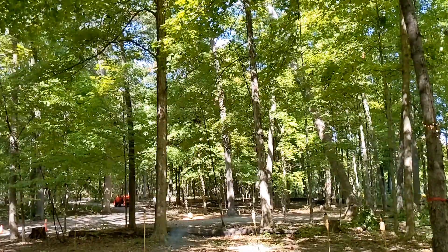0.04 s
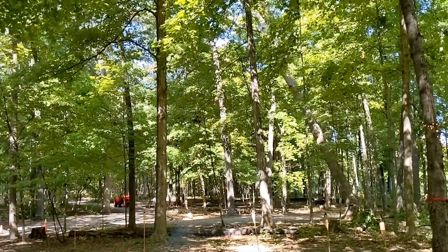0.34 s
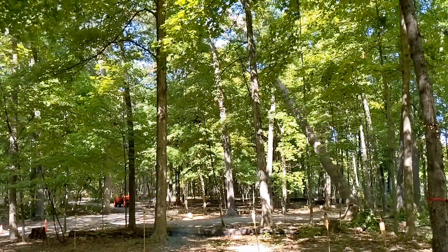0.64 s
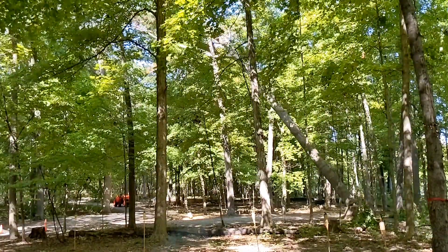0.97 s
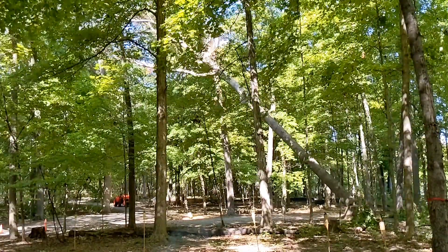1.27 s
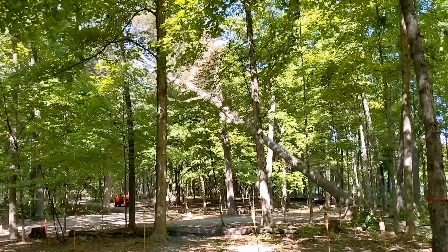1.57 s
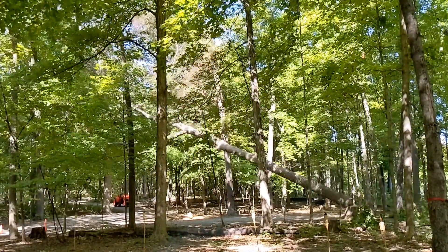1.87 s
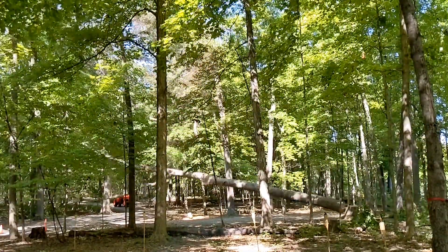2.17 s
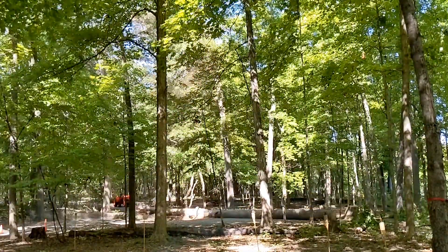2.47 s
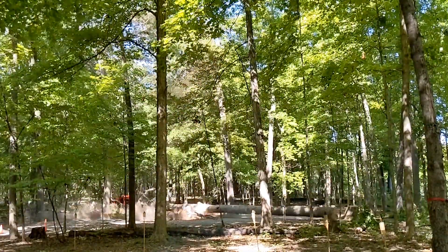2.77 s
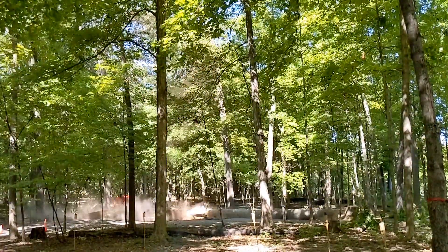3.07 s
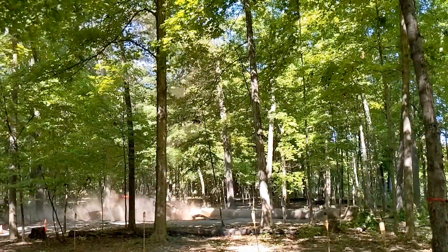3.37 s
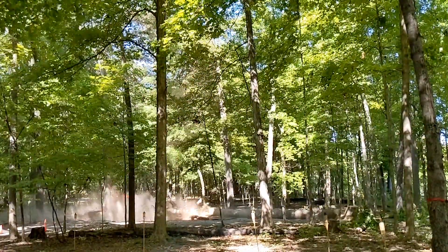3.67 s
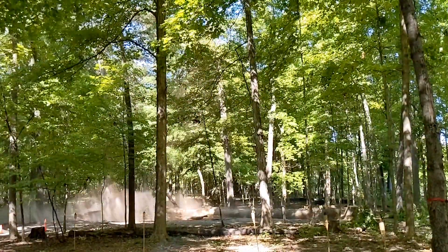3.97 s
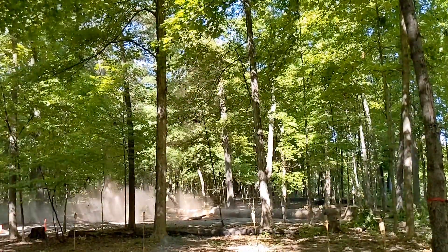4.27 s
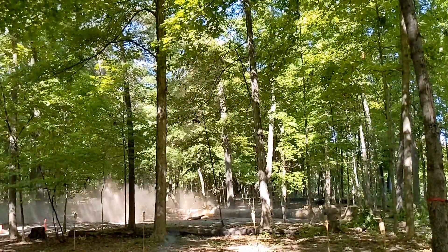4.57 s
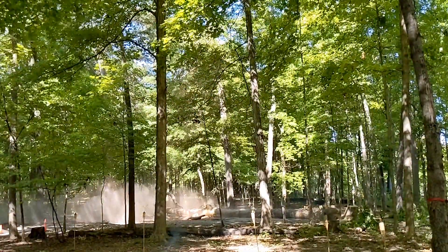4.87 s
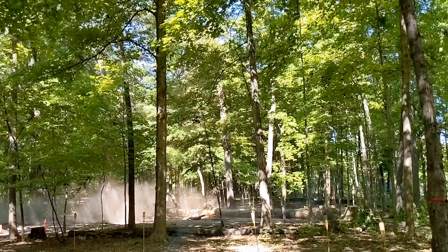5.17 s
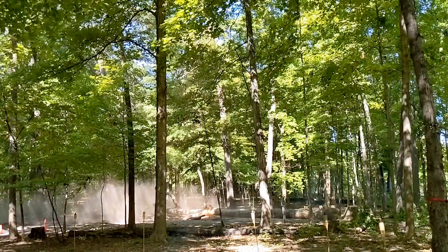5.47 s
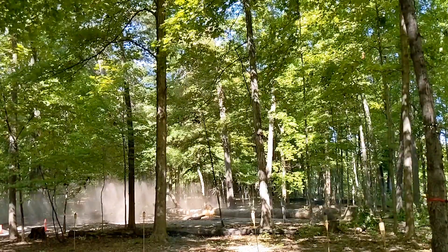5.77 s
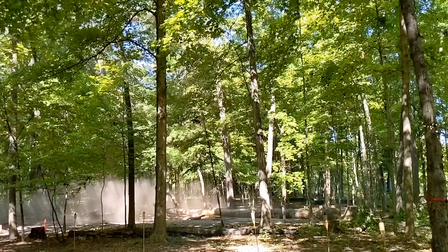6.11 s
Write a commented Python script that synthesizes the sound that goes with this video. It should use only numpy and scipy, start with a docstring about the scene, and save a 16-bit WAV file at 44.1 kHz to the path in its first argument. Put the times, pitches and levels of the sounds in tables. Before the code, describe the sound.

A sharp crack of wood opens the sound as a tall tree starts to fall in a forest. More splintering cracks and dull knocks follow through the first second. From about 1.1 to 1.6 seconds a loud volley of breaking limbs comes with a swelling rustle and crackle as the crown tears through neighbouring trees. This eases slightly, then surges at 2.4 seconds, and the trunk hits the ground at about 2.6 with a heavy, low boom. Branches keep breaking and leaves thrash until around 3.3 seconds. Another limb lands with a thud and sharp snaps near 3.8 seconds. After that the rustle fades, with a few small twig snaps and soft knocks until the end at about 6 seconds. The cracks and thuds echo briefly among the trees, and a very faint machine hums far away throughout.

```python
"""A leafy wood, where a tall tree goes over from right to left. Its hinge and limbs crack in volleys of
parting fibres, the crown tears through its neighbours in a wash of crackle and rustle, and the trunk
slams into the ground with a low boom. Limbs drop after it, twigs snap and leaves settle. Cracks, thuds
and snaps scatter off the standing trunks, and a machine hums far away."""
import sys
import numpy as np
from scipy import signal
from scipy.fft import rfft, irfft, next_fast_len
from scipy.io import wavfile

SR = 44100
rng = np.random.default_rng(int(sys.argv[2]) if len(sys.argv) > 2 else 0)


def generate_wav(sig):
    """Save sig (samples, or channels by samples) to the path in sys.argv[1] as 16-bit PCM at SR."""
    pcm = np.round(np.clip(np.atleast_2d(sig).T, -1, 1) * 32767).astype(np.int16)
    wavfile.write(sys.argv[1], SR, pcm)


N = 270774
TIME = np.arange(N) / SR
TRUNK_REACH = .5   # the trunk lies half as far off centre as the crown

# The far machine's drone. Each row: pitch in Hz, level in dB.
MACHINE_TONES = [(83, -81.5), (119, -62), (168, -65.5), (251, -73), (296, -59.5)]
# The crown's direction. Each row: time in seconds, lead of the left microphone in samples.
CROWN_BEARING = [(0, 2), (1.2, 4), (1.7, 6), (2.25, 9), (2.7, 7), (3.3, 7), (3.7, 5), (6.1, 5)]
# Pan of the breaking wood and foliage. Each row: time in seconds, left minus right in dB.
CROWN_PAN = [(0, 1), (1.0, 0.2), (1.3, -2.2), (1.8, 0), (2.3, -0.2), (2.6, -3.5), (3.2, -1.8), (3.6, 0.6),
             (6.1, 0)]
# Tone of each texture. Each row: frequency in Hz, gain in dB.
BRANCH_EQ = [(150, -15.5), (220, -7), (400, -3.5), (700, 1), (1100, -0.5), (1600, -0.5), (2300, -1.5),
             (3500, -9.5), (7000, -24.5)]
LEAF_EQ = [(700, -46), (1300, 0.5), (2400, 4), (4000, 0), (6000, -2), (8500, -9), (10500, -12),
           (12500, -9.5), (15000, -17.5)]
TWIG_EQ = [(1200, 24), (2400, -2), (4000, -6), (8000, -12), (13000, -38)]
RUMBLE_EQ = [(25, -2), (48, -10.5), (72, 5), (130, 1.5), (200, 1.5), (300, -6.5), (500, -2.5), (1000, -34)]
SPLINTER_EQ = [(60, -29), (200, 1), (600, 2.5), (2200, 2.5), (3300, -7.5), (5000, -7.5), (9000, -25),
               (15000, -78)]
# Fader rides for stirred leaves and for small branches breaking. Each row: time in seconds, level in dB.
LEAF_RIDE = [(0, -40), (.38, -35.5), (.58, -34), (1.05, -29), (1.2, -25), (1.6, -25.5), (2.0, -27),
             (2.4, -25), (3.25, -27), (3.55, -34), (3.85, -31), (4.5, -40), (5.1, -48), (5.8, -51.5)]
BRANCH_RIDE = [(.04, -22), (.28, -31.5), (.6, -25.5), (1.05, -27), (1.3, -18), (1.7, -25.5), (2.05, -28.5),
               (2.42, -21.5), (2.62, -16.5), (3.1, -19), (3.55, -31), (4.3, -43.5), (4.8, -41.5),
               (5.5, -52.5), (6.14, -54)]
# Wood breaking. Each row: start and length in seconds, level in dB, pitch in Hz,
# splinters against the body in dB.
WOOD_CRACKS = [(.011, 0.0039, -11.5, 1730, -12), (0.099, 0.017, -19.5, 920, -7),
               (.176, 0.02, -22, 905, -7.5), (0.397, 0.029, -15.5, 770, -25), (.431, 0.025, -17, 540, -0.5),
               (0.532, .0085, -10.5, 850, -15), (0.64, 0.012, -21, 1240, 3), (0.699, .0093, -23.5, 806, -2),
               (0.718, 0.026, -22, 800, 3), (0.949, 0.014, -26, 1220, 3), (1.049, 0.013, -22, 600, -15),
               (1.088, 0.021, -16, 1170, -4), (1.128, 0.0074, -20, 1010, -1), (1.17, 0.023, -17, 490, -2.5),
               (1.253, 0.024, -10, 423, -10), (1.28, 0.027, -19.5, 636, 6), (1.36, 0.014, -11, 890, -18),
               (1.505, 0.0066, -15.5, 357, -0.5), (1.521, 0.013, -12.5, 2100, -15),
               (1.534, 0.007, -14, 715, 0.5), (1.866, 0.01, -25, 1210, -10), (1.925, 0.012, -29, 814, 2.5),
               (2.121, 0.0067, -18, 1830, -19), (2.169, 0.016, -24.5, 1770, -3),
               (2.301, 0.01, -25, 990, 9.5), (2.384, 0.029, -20, 1110, -10),
               (2.476, 0.026, -13.5, 650, -24), (2.5, 0.046, -17.5, 865, -19),
               (2.536, 0.089, -26.5, 493, 5), (2.82, 0.041, -24, 1050, 2.5), (2.951, 0.033, -22, 943, -27),
               (2.982, 0.0068, -11.5, 920, -22), (3.061, 0.0045, -12.5, 2180, -9),
               (3.22, 0.071, -29.5, 1120, -2), (3.818, 0.0029, -10.5, 2510, -13),
               (4.531, 0.017, -40.5, 400, -10), (4.635, 0.0062, -43, 382, 13.5), (5.056, .007, -45, 387, 3),
               (6.068, 0.0033, -39, 2300, -9)]
# Heavy wood hitting trunks and ground; the first three rows, in the first second, are the hinge groaning low
# before the fall. Each row: start and length in seconds, level in dB, pitch in Hz.
LOG_THUDS = [(.02, 0.11, -34, 195), (0.441, 0.027, -30.5, 185), (0.654, 0.12, -33.5, 203),
             (1.171, 0.051, -25.5, 73), (1.18, 0.044, -23.5, 215), (1.5, 0.094, -37, 74.6),
             (1.252, 0.063, -21.5, 308), (2.505, 0.1, -20.5, 111), (2.586, 0.063, -19.5, 225),
             (2.626, 0.055, -15, 130), (2.641, 0.074, -12, 73), (3.176, 0.011, -16, 148),
             (3.742, 0.0052, -12, 261), (3.751, 0.011, -19.5, 232), (3.763, 0.022, -23.5, 85),
             (3.79, .17, -34.5, 123), (4.642, 0.0051, -30, 245), (4.78, 0.019, -42, 139),
             (5.055, 0.033, -40, 287)]
# Boughs whipping past or flopping down. Each row: start and length in seconds, leaves and branches in dB.
BOUGH_SWISHES = [(0.417, .03, -29.5, -28), (.642, .012, -34, -42), (1.1, 0.036, -30, -44),
                 (1.517, 0.1, -29.5, -38), (2.106, 0.017, -27.5, -48), (2.477, 0.042, -18.5, -42),
                 (2.69, 0.0096, -24.5, -36), (2.942, 0.014, -21.5, -41), (3.133, 0.11, -23, -27.5),
                 (3.798, 0.056, -31, -45), (4.096, 0.067, -30.5, -37), (4.637, 0.05, -34.5, -46),
                 (5.193, 0.036, -38.5, -56)]
# Dry twigs. Each row: start in seconds, peak of the ring in dB, pitch in Hz.
TWIG_SNAPS = [(2.83, -9, 2360), (3.127, -10.5, 9300), (3.7, -21, 5000), (3.743, -14.5, 3000),
              (3.807, -17, 3240), (3.841, -13, 6060), (4.118, -13, 4170), (4.583, -24.5, 6700),
              (4.638, -17.5, 2840), (5.058, -27.5, 2200), (5.195, -26, 8300), (5.522, -31.5, 2430)]
# Tone of the side signal and of each microphone. Each row: frequency in Hz, gain in dB.
SIDE_EQ = [(100, -6), (250, -0.5), (500, -3), (1000, -0.5), (2000, 1), (4000, 0)]
LEFT_EQ = [(900, 0.5), (1350, 3.5), (2400, 3), (4400, 0.5), (8100, 1.5), (10500, 3.5), (13800, 5.5),
           (15000, -6)]
RIGHT_EQ = [(1400, -1.5), (1700, -3.5), (3400, -1), (4700, -2.5), (6200, -6.5), (7000, -3.5), (9300, 4),
            (11500, 0), (13000, -4)]
# Peaks and dips of the left microphone's port. Each row: centre and width in Hz, gain in dB.
PORT_BANDS = [(1535, 330, -10), (2280, 67, 2.5), (2595, 270, -9.5), (3170, 240, 1), (3580, 380, -2),
              (4280, 180, 4), (5220, 180, 4), (6210, 130, 5), (7084, 306, 10.5), (8200, 450, 9.5),
              (9030, 210, 5), (11060, 420, -2)]


def from_db(db):
    """Decibels to gain."""
    return 10 ** (np.asarray(db) / 20)


def curve(rows, t=TIME):
    """Read an automation curve at times t."""
    return np.interp(t, *np.transpose(rows))


def drift(per_s):
    """Slow random wobble with a spread of about one."""
    knots = rng.standard_normal(4096)
    return np.interp(TIME * per_s, np.arange(len(knots)), knots)


def equalise(x, points):
    """Minimum-phase EQ through points of frequency and gain."""
    size = 2 * next_fast_len(x.shape[-1] // 2 + 2048)
    hz, db = np.transpose(points)
    grid = np.maximum(np.fft.rfftfreq(size, 1 / SR), 1)
    gain = from_db(np.interp(np.log(grid), np.log(hz), db))
    cepstrum = irfft(np.log(gain))
    cepstrum[1:size // 2] *= 2
    cepstrum[size // 2 + 1:] = 0
    return irfft(rfft(x, size) * np.exp(rfft(cepstrum)))[..., :x.shape[-1]]


def resonate(x, hz, width_hz):
    """One resonance with unity gain at its peak."""
    r = np.exp(-np.pi * width_hz / SR)
    feedback = [1, -2 * r * np.cos(2 * np.pi * hz / SR), r * r]
    return signal.lfilter(np.array([1, 0, -1]) * (1 - r * r) / 2, feedback, x + 1e-18)


def burst(t, length, rise, fall):
    """Envelope that swells, holds, then dies; all in seconds."""
    return (1 - np.exp(-t / rise)) * np.exp(-np.maximum(t - length, 0) / fall)


def levelled(x, length):
    """Give a burst the energy of `length` seconds at unit power."""
    return x / np.sqrt(np.sum(x ** 2) / (length * SR) + 1e-20)


def place(out, sound, start_s, reach=1):
    """Lay a hit into both channels, the right one later as the bearing says."""
    for channel, lag in enumerate((0, int(round(reach * curve(CROWN_BEARING, start_s))))):
        start = int(start_s * SR) + lag
        out[channel, start:start + len(sound)] += sound[:N - start]


def machine(waver_hz=2.78, flutter_db=4.0):
    """A distant engine's low tones waver on their way through the trees."""
    hum = 0
    for hz, db in MACHINE_TONES:
        level = from_db(db + flutter_db * drift(7.8))
        phase = 2 * np.pi * np.cumsum(hz + waver_hz * drift(20)) / SR
        hum += np.sqrt(2) * level * np.sin(phase)
    return hum


def grains(eq, per_s, size_db, clump_db, spread_samples, reach=1, bands=14):
    """Clumps of uneven clicks, each ringing briefly in one band from its own direction; unit power."""
    at = np.flatnonzero(rng.random(N) < per_s / SR)
    grain_db = size_db * np.minimum(rng.exponential(1, N), 4)[at] + clump_db * drift(60)[at]
    sizes = from_db(grain_db) * rng.choice([-1, 1], N)[at]
    scatter = spread_samples * rng.standard_normal(N)[at]
    lag = np.round(reach * curve(CROWN_BEARING, TIME[at]) + scatter).astype(int)
    band = rng.integers(0, bands, N)[at]
    pitches = np.geomspace(eq[0][0], eq[-1][0], bands)
    damping = np.log(pitches[1] / pitches[0])   # neighbouring rings just overlap
    rings = 0
    for k, hz in enumerate(pitches):
        clicks = [np.bincount(np.clip(at + side, 0, N - 1), sizes * (band == k), N) for side in (0, lag)]
        rings += resonate(np.array(clicks), hz, damping * hz)
    texture = equalise(rings, eq)
    return texture / np.sqrt(np.mean(texture ** 2) + 1e-20)


def crown(twig_db=-16):
    """Branches crackle, leaves rustle among ticking twigs, and heavy limbs shudder underneath."""
    branches = grains(BRANCH_EQ, per_s=7000, size_db=3.2, clump_db=1, spread_samples=6.25)
    leaves = grains(LEAF_EQ, per_s=26000, size_db=-1.5, clump_db=1, spread_samples=5)
    twigs = grains(TWIG_EQ, per_s=80, size_db=2.5, clump_db=-4.5, spread_samples=2.2, bands=7)
    rumble = grains(RUMBLE_EQ, per_s=2500, size_db=3.5, clump_db=.5, spread_samples=18, reach=TRUNK_REACH)
    leaf_swish, branch_swish = swish_gains()
    foliage = open_treble(leaves + from_db(twig_db) * twigs)
    rustle = foliage * np.hypot(from_db(curve(LEAF_RIDE)), leaf_swish)
    crackle = branches * np.hypot(from_db(curve(BRANCH_RIDE)), branch_swish)
    return crackle + rustle + rumble * rumble_gain()


def open_treble(rustle, shelf_hz=9500, flat_at_s=1.97, db_per_s=1.2):
    """The rustle's top end opens steadily as the crown comes down out of the foliage."""
    treble = signal.sosfiltfilt(signal.butter(3, shelf_hz, "high", fs=SR, output="sos"), rustle)
    return rustle + treble * (from_db(db_per_s * (TIME - flat_at_s)) - 1)


def rumble_gain(shudder_db=-23, floor_db=-50.5, shake_db=1, reference_hz=98, fall_db_per_s=23):
    """Rumble rides the breaking branches; each thud shakes limbs and earth, the deeper the more."""
    power = from_db(curve(BRANCH_RIDE) + shudder_db) ** 2 + from_db(floor_db) ** 2
    for start, length, db, hz in LOG_THUDS:
        fed_s = np.clip(TIME - start, 0, length)
        since_s = np.maximum(TIME - start - length, 0)
        power += fed_s * (from_db(db + shake_db - fall_db_per_s * since_s) * reference_hz / hz) ** 2
    return np.sqrt(power)


def cracks(slips_per_s=4500, size_db=1.5, damping=.68):
    """Fibres part in a swelling volley; the limb gives it a broad ring and splinters add an edge."""
    out, t = np.zeros((2, N)), TIME[:SR // 5]
    for start, length, db, hz, splinter_db in WOOD_CRACKS:
        slips = (rng.random(len(t)) < slips_per_s / SR) * rng.choice([-1, 1], len(t))
        slips = slips * from_db(size_db * np.minimum(rng.exponential(1, len(t)), 3))
        slips *= burst(t, length, rise=.061 * length, fall=.0042)
        ring = resonate(slips, hz, damping * hz)
        body = signal.sosfilt(signal.butter(2, 2 * hz, fs=SR, output="sos"), ring)
        edge = equalise(slips * rng.choice([-1, 1], len(t)), SPLINTER_EQ)
        crack = levelled(body, length) + from_db(splinter_db) * levelled(edge, length)
        place(out, from_db(db) * crack, start)
    return out


def thuds(first_blow=26, damping=.34):
    """A log strikes, then lands along its length: many soft contacts drive one low, damped boom."""
    out, t = np.zeros((2, N)), TIME[:SR // 2]
    for start, length, db, hz in LOG_THUDS:
        push = rng.standard_normal(len(t)) * burst(t, length, rise=.0052, fall=.002)
        push[0] = first_blow
        boom = resonate(resonate(push, hz, damping * hz), hz, 1.47 * hz)
        place(out, from_db(db) * levelled(boom, length), start, TRUNK_REACH)
    return out


def forest_echo(hits, count=2500, t60_s=.69, band_hz=(220, 4500), nearest_s=.012):
    """Trunks throw echoes from all sides; the bass passes them by and foliage dulls the top."""
    delay_s = nearest_s + rng.random(count) ** 1.5
    strength = rng.standard_normal(count) * from_db(-60 * delay_s / t60_s)
    lag = rng.integers(-18, 19, count)
    at = (delay_s * SR).astype(int)
    echoes = np.array([np.bincount(at + side, strength, 2 * SR) for side in (0, lag)])
    echoes /= np.linalg.norm(strength)
    tail = signal.sosfilt(signal.butter(1, band_hz, "band", fs=SR, output="sos"), echoes + 1e-18)
    return signal.fftconvolve(hits[:1], tail, axes=1)[:, :N]


def swish_gains(rise_s=.011, settle_db=-1):
    """Gains for leaves and for branches: each bough whips by, then trembles and settles."""
    power = 0
    for start, length, leaves_db, branches_db in BOUGH_SWISHES:
        t = np.maximum(TIME - start, 0)
        whip = burst(t, length, rise_s, fall=.025)
        tremble = from_db(settle_db) * burst(t, length, rise_s, fall=.16)
        power += (from_db([[leaves_db], [branches_db]]) * np.hypot(whip, tremble)) ** 2
    return np.sqrt(power)


def snaps(tick_db=-4, splinter_db=-14, splinter_s=.0048, damping=.22):
    """A twig breaks with one tick, rings for a few cycles and sheds tiny splinters."""
    out, t = np.zeros((2, N)), TIME[:SR // 10]
    for start, db, hz in TWIG_SNAPS:
        force = from_db(splinter_db) * rng.laplace(0, .5, len(t)) * np.exp(-t / splinter_s)
        force[0] = 1
        ring = resonate(force, hz, damping * hz)
        tick = resonate(force, hz, 2 * hz)
        snap = ring / np.abs(ring).max() + from_db(tick_db) * tick / np.abs(tick).max()
        place(out, from_db(db) * snap, start)
    return out


def scene(echo_db=-5):
    """Breaks and crown pan together, the thuds stay near the centre, and all hits feed the echo."""
    breaks = cracks() + snaps()
    logs = thuds()
    pan = from_db(curve(CROWN_PAN) / 2 * np.array([[1], [-1]]))
    treetop = (breaks + crown()) * pan
    return treetop + logs + from_db(echo_db) * forest_echo(breaks + logs) + machine()


def record(dry, bass_cut_hz=46, top_cut_hz=15100):
    """A stereo pair with narrow bass and a ringing left port; peaks are rounded, lows and top cut."""
    mid = (dry[0] + dry[1]) / 2
    side = equalise((dry[0] - dry[1]) / 2, SIDE_EQ)
    left, right = equalise(mid + side, LEFT_EQ), equalise(mid - side, RIGHT_EQ)
    for hz, width_hz, gain_db in PORT_BANDS:
        left = left + (from_db(gain_db) - 1) * resonate(left, hz, width_hz)
    pair = signal.sosfilt(signal.butter(2, bass_cut_hz, "high", fs=SR, output="sos"), [left, right])
    rounded = pair / (1 + pair ** 6) ** (1 / 6)
    return signal.sosfilt(signal.ellip(10, .2, 90, top_cut_hz, fs=SR, output="sos"), rounded)


dry = scene()
out = record(dry)
generate_wav(out)
```